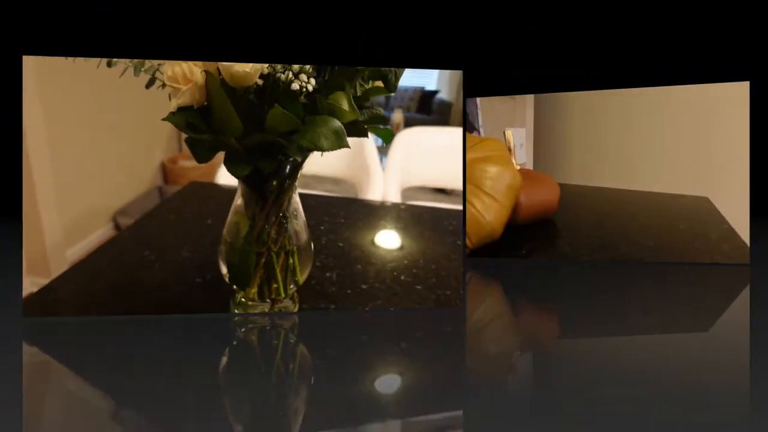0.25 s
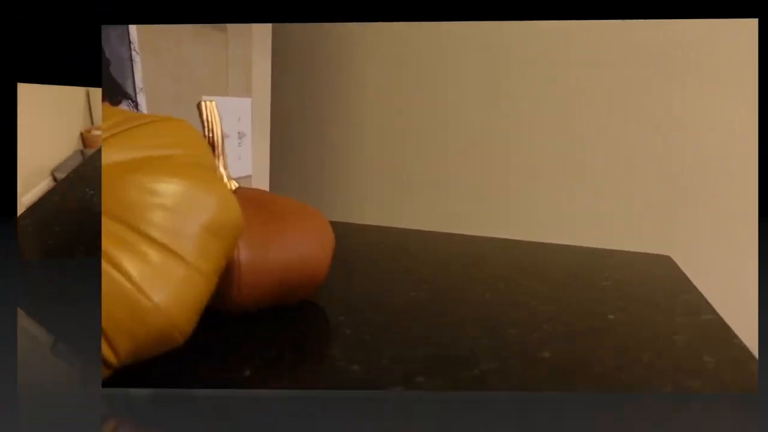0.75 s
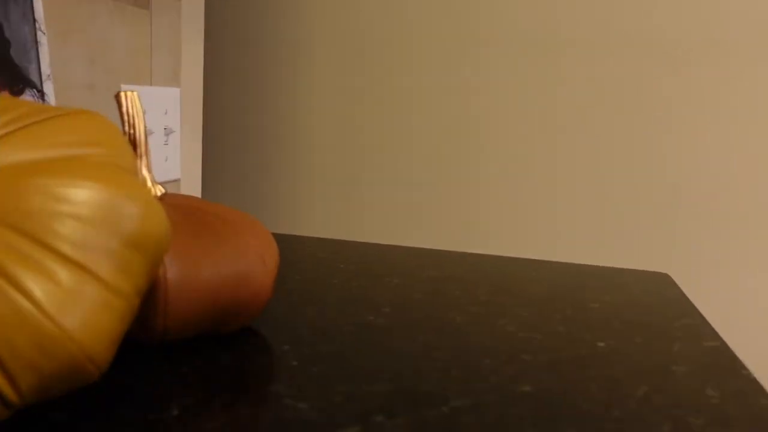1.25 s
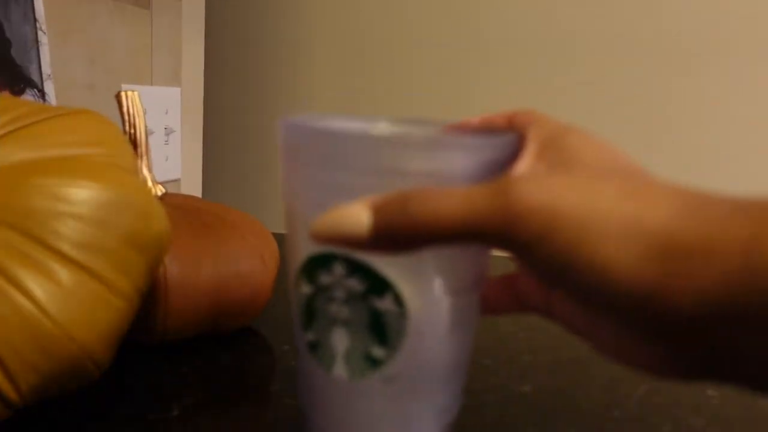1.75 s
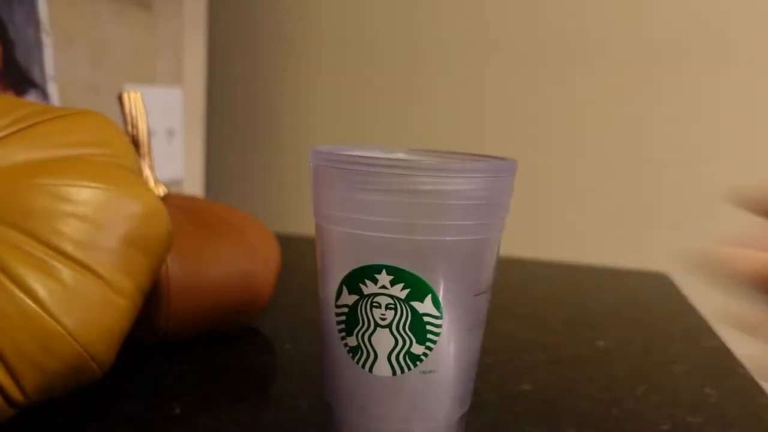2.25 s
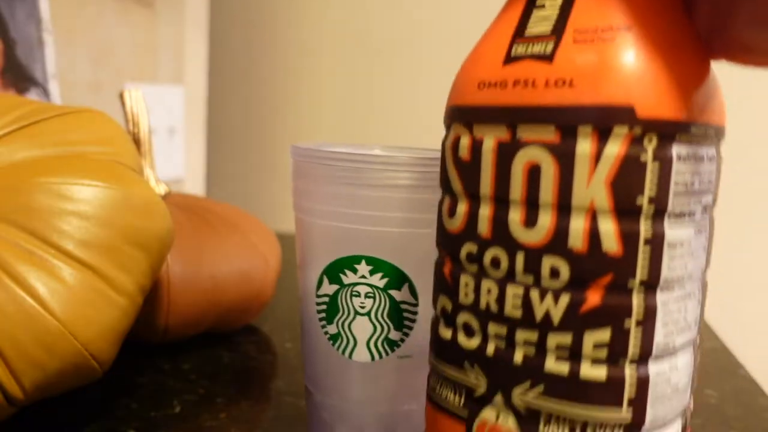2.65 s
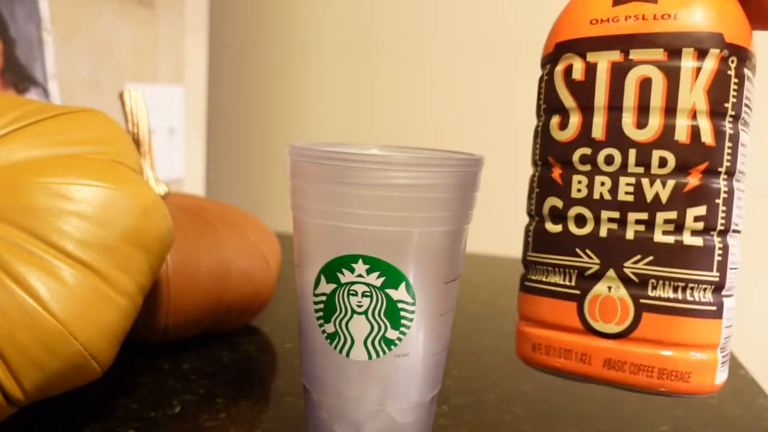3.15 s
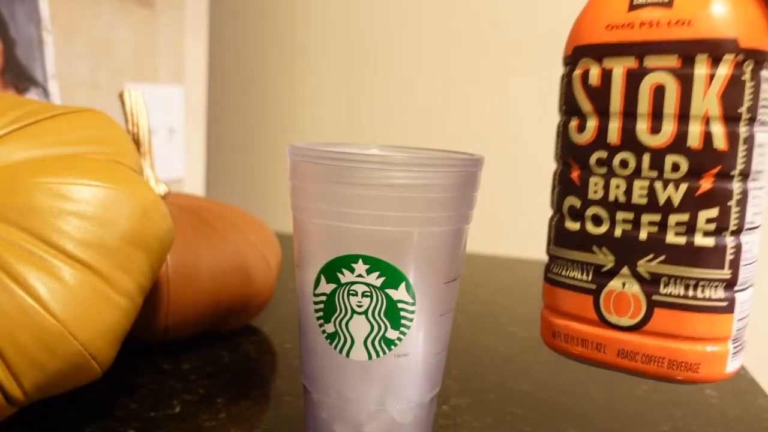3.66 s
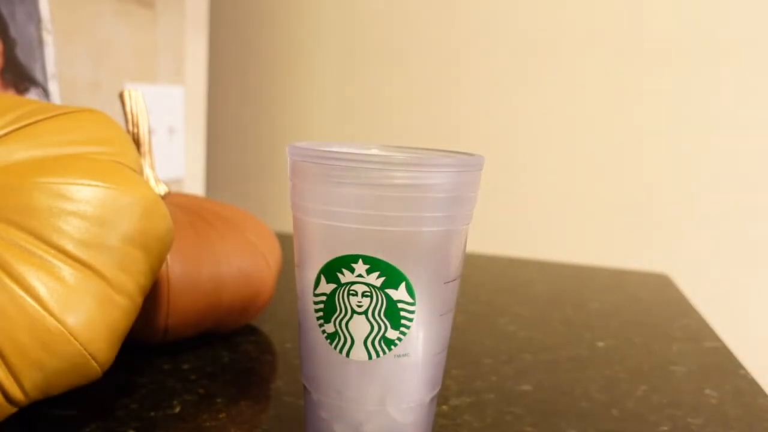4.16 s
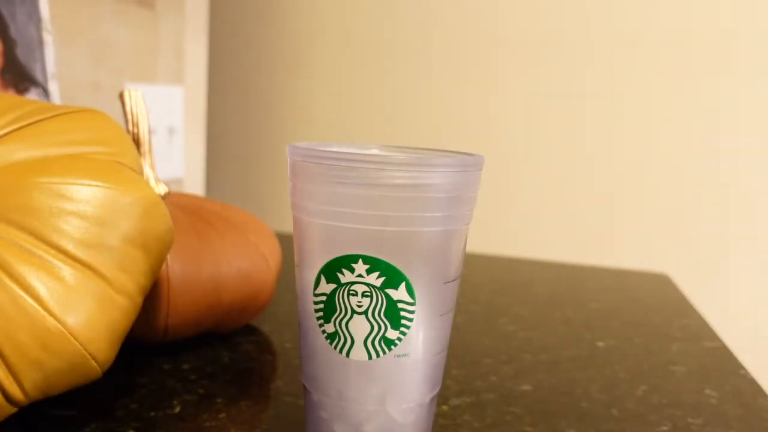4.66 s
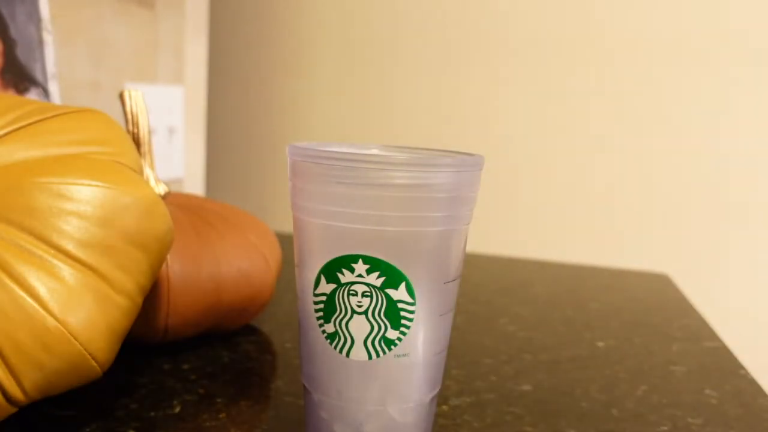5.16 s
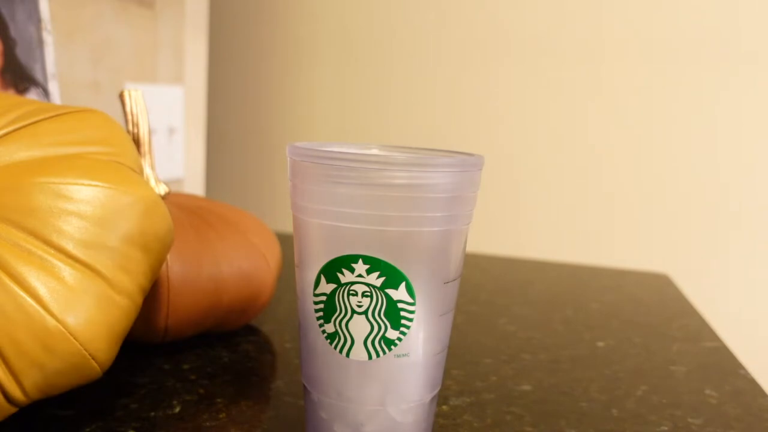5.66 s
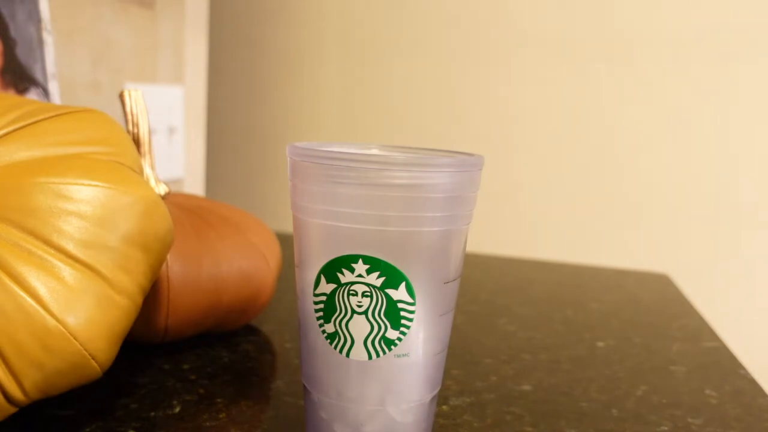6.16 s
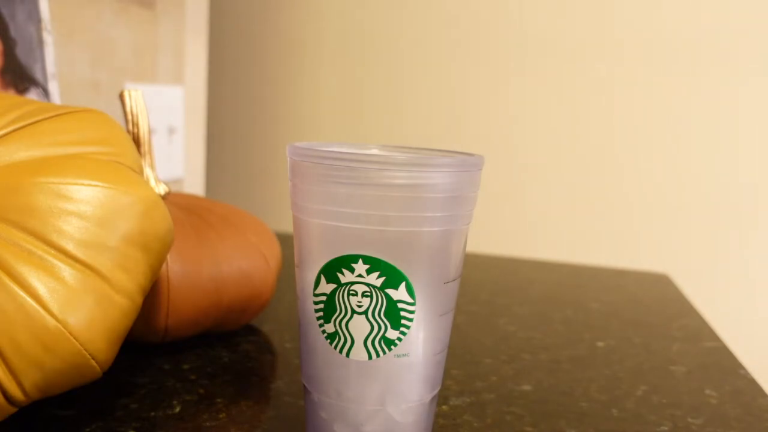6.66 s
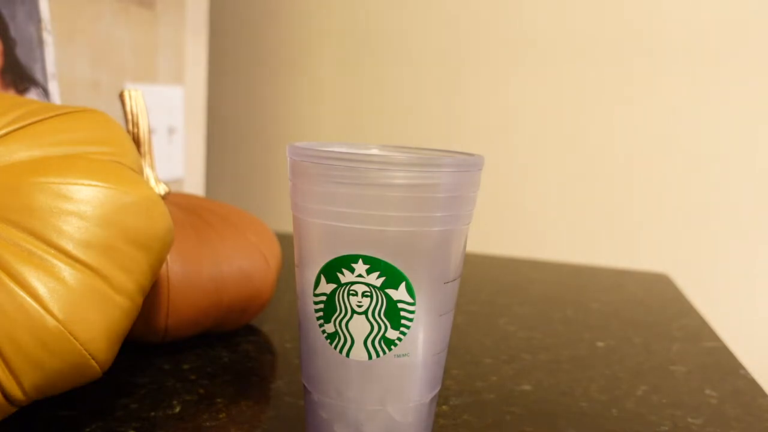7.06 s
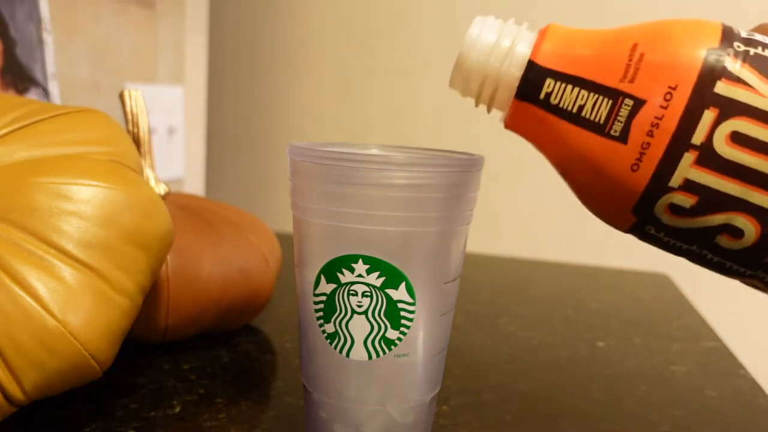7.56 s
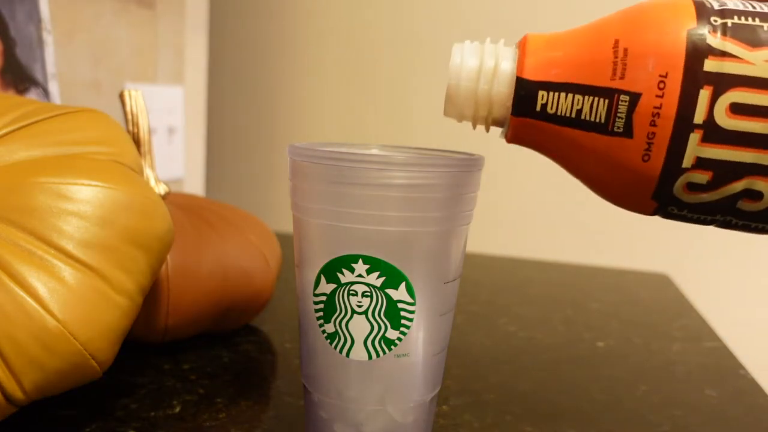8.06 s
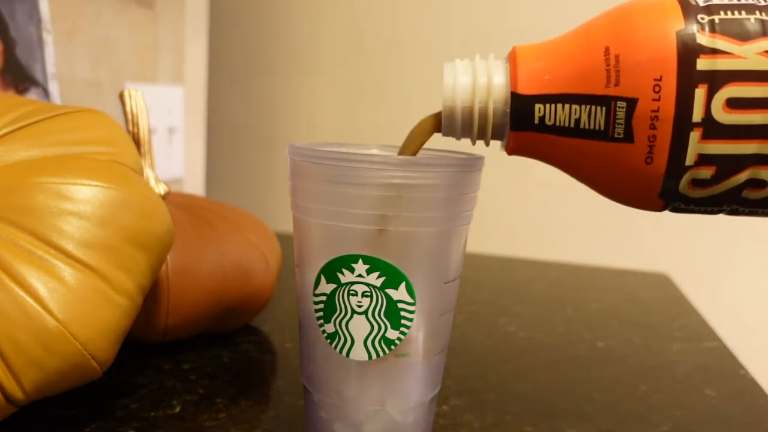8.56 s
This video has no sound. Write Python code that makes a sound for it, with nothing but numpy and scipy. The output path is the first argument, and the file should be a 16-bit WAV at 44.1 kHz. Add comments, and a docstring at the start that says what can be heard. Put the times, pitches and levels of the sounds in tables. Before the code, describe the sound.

Quiet kitchen air and a soft appliance hum fade in over the first half second. Faint light plastic clicks and rubs come at 0.4 and 0.8, with a thin high whine near 0.5, then a quick cluster at 1.25-1.5 and a whine swell at 1.7. At 1.9 a hard plastic cup strikes the stone loudly, with a hollow ring and rocking taps to 2.1. Bottle knocks and a solid thud follow at 2.4-2.65. Near quiet holds, with a faint tick at 3.7 and a click at 4.2. Rubbing at 4.6 leads to dense knocks, cracks and buckling plastic from 4.75 to 5.6. The cap rattles brightly at 6.0-6.13; small taps and rubs follow at 6.4-6.95. The whine returns at 7.2 and weakly until 8.1. Tiny bright splashes and spray enter the cup from 8.5 to 8.8. Close stereo, with sparse room echoes.

```python
"""Hum and air fade in around a quiet kitchen with a stone counter, heard close, at a camera. A hard plastic
cup is picked up and set down, a plastic bottle lands beside it, is squeezed and unscrewed, its cap rattles
free and the first drops splash into the cup, while a thin whine comes and goes in the treble. Blows and
cracks are decaying modes, rubs are dense noise slips, the bass of things is decaying sines; the near things
stay dry against sparse echoes, and the air and appliance are shaped noise."""
import sys
import numpy as np
from scipy import signal
from scipy.fft import rfft, irfft, next_fast_len
from scipy.io import wavfile
from scipy.ndimage import uniform_filter1d

SR = 44100
rng = np.random.default_rng(int(sys.argv[2]) if len(sys.argv) > 2 else 0)


def unload_audio(sound):
    """Save the sound as a 16-bit wav file, at the path given as the first command line argument."""
    columns = np.transpose(np.atleast_2d(sound))
    # keep every value between -1 and 1, then stretch to whole-number steps
    steps = np.round(np.clip(columns, -1, 1) * 32767)
    wavfile.write(sys.argv[1], SR, steps.astype(np.int16))


N = 388521  # samples, about 8.8 s

# All event and band levels stand ahead of the output gain in record().
# Air of the room: (frequency [Hz], density [dB per Hz, relative])
AIR_SPECTRUM = [(15, -52), (25, -23.5), (226, -6), (252, 1.5), (280, -7.5), (483, -16), (600, -3),
                (746, -19), (927, -14), (1360, -21), (1550, -22.5), (2400, -22.5), (10100, -32.5),
                (15200, -35.5), (16500, -61)]
AIR_DB = -50 + 4.0  # level of the whole air noise
# Fuzzy bands of the appliance: (frequency [Hz], width [Hz], level [dB])
APPLIANCE_BANDS = [(251, 5.7, -72.5), (593, 24, -56.5), (1038, 120, -56), (1530, 91, -51),
                   (6080, 56, -63.5)]
# Likeness of left and right in the room tone: (frequency [Hz], likeness [0-1])
LEFT_RIGHT_LIKENESS = [(60, 0.46), (180, 0.75), (550, 0.68), (1650, 0.51), (4970, 0.55), (15000, 1)]

# Blow tables: (time [s], peak at 1.3-3.6 kHz [dB], weight: below 1.3 kHz [relative dB],
#               hardness: 3.6-8 kHz [relative dB])
# Rub tables: (time of peak [s], level at 1.3-3.6 kHz [dB], rise by 20 dB [s], fall by 20 dB [s],
#              weight [relative dB], hardness [relative dB])
# Mode tables: (frequency [Hz], width [Hz], level [dB])
# The cup is picked up and carried over: blows, rubs, modes
PICKUP_BLOWS = [(.398, -30, -7, 0), (.833, -37, -22, 3), (1.247, -48, -18, 10), (1.259, -36, -19, 0),
                (1.3465, -26.5, -11, 3), (1.381, -29.5, -2.2, -16), (1.424, -35, -19, 4.5),
                (1.439, -30, -1.2, -5), (1.461, -31, -12, 0), (1.474, -18.5, -6, 5),
                (1.487, -22.5, -25, -11), (1.497, -27, -20, -7)]
PICKUP_RUBS = [(0.41, -38.5, 0.016, 0.09, -19, 0.5), (0.546, -47.5, 0.11, 0.2, -13, -5),
               (0.84, -44, 0.051, 0.22, -26, 4), (1.275, -47, .06, 0.11, -9, 2),
               (1.37, -50, 0.018, 0.11, 4, -13), (1.46, -44.5, 0.11, 0.0073, 6, -9)]
PICKUP_MODES = [(676, 190, -18), (1226, 86, 5.5), (3000, 450, -26), (3660, 420, -6), (4630, 930, 12),
                (5600, 1500, 18.5), (7750, 740, 5)]
# Swells of the thin whine: (time of peak [s], level [dB], rise by 20 dB [s], fall by 20 dB [s])
WHINE_SWELLS = [(0.514, -55, .04, .16), (1.71, -45.5, .012, 0.24), (7.24, -44.5, .018, 0.32),
                (7.594, -61, .02, 0.073), (7.86, -58, .06, 0.062), (8.072, -55.5, 0.087, 0.14)]
# Resonance of the whine, passed twice: mode columns
WHINE_MODES = [(9880, 640, 22), (10400, 300, 1), (10900, 250, -45)]
# Thumps through the counter: (time [s], level of low mode 1 [dB], mode 2 [dB], mode 3 [dB])
THUMPS = [(1.913, -43, -53, -49), (1.99, -30.5, -55, -40), (2.395, -33, -32.5, -42),
          (2.481, -29, -55, -31.5), (2.616, -29, -33, -28), (4.221, -55, -44, -33.5),
          (4.879, -56, -31, -43), (5.239, -37, -36.5, -42), (5.344, -47, -29, -38),
          (6.134, -78, -63, -41.5)]
# The three low modes of the counter: (frequency [Hz], t60 [s])
COUNTER_MODES = [(66, 0.18), (102, 0.3), (150, 0.29)]
# The cup is set down, then rocks and slides to rest: blows, rubs, modes
CUP_BLOWS = [(1.916, -6, -1, -8.5), (1.9382, -17, 0, -13), (1.9674, -19, -4, -22), (1.9934, -18, -1, -4),
             (2.0412, -26, -19, 4.5), (2.058, -28.5, -14, 4.5), (2.085, -36, -7, 3), (2.113, -34.5, -5, 2)]
CUP_ROCKING = [(1.948, -22.5, 0.023, 0.077, 5.3, -4.5), (2.07, -39.5, .08, 0.17, 5.5, -8),
               (2.65, -30.5, 0.029, 0.0095, 9.6, 3)]
CUP_MODES = [(668, 12.3, -1.5), (743, 20, -6.5), (863, 92, 0), (1000, 120, 2.5), (1590, 870, -1),
             (2400, 450, -12.5), (3550, 330, -7), (5460, 2100, -1.5), (6800, 1300, -42)]
# Air in the empty cup humming after a jolt: (time [s], level [dB], t60 [s])
CUP_HUMS = [(1.917, -0.5, 0.1), (1.969, -11.5, 0.27), (1.995, -9.5, 0.29), (2.6165, 4, 0.056),
            (2.629, -12, 0.13)]
CUP_AIR_HZ = 666.8
# Sharp cracks of stiff plastic: (time [s], level [dB], frequency [Hz])
CRACKS = [(1.9175, -1.5, 3600), (4.2125, -16, 4500), (4.219, -9, 2200), (4.741, -2, 1000),
          (4.917, -6.5, 910), (4.7505, -14, 1810), (4.9655, -15, 2000), (5.0105, 6, 5900),
          (5.2845, 4, 7260), (5.5448, -2, 7140), (6.0515, -3, 3850), (6.1015, 8.5, 3600),
          (6.1332, -6.5, 3900), (6.9595, -15, 5000)]
CRACK_CYCLES = 1.6  # cycles for a crack to sink to 1/e
# The bottle is handled: blows, then rubs of sliding hands and creasing plastic, modes
BOTTLE_BLOWS = [(2.3978, -26, 5, -16), (2.4157, -42, 13, -18), (2.483, -13.5, -0.5, -9.5),
                (2.5063, -28, 4, -6), (2.5252, -34, 0, -6), (2.5826, -21, 3.5, -2.5),
                (3.7048, -34, -1, -3.5), (4.2099, -28.5, -3, 5), (4.2174, -25.5, -5, -2),
                (4.7409, -11.5, 4, -11.5), (4.7487, -12, 1.5, -7), (4.8768, -35, 5.5, -8),
                (4.9165, -14.5, 3.5, -7.5), (4.9551, -29, -11, -2.2), (4.9641, -8, -5.5, -9.5),
                (4.9988, -14, -22, -5), (5.0097, -15, -15, 7), (5.0131, -10.5, -1, -11),
                (5.027, -5, -11.5, -19), (5.0338, -12, 0.5, -8), (5.073, -17.5, 1.5, -19),
                (5.1525, -7.5, -0.5, -10.5), (5.1935, -35, 12, -22), (5.2124, -6.5, -6.5, -14),
                (5.2353, -15.5, -14, 1), (5.2381, -5.5, 1, -16), (5.2526, -16, 9.5, -8),
                (5.2571, -22, 4, 5), (5.2843, -5.5, -25, -11), (5.3124, -20, -19, -15),
                (5.3295, -14.5, -13, -21), (5.3573, -14, 5, -4), (5.383, -28, -17, -4),
                (5.4093, -6, -1.7, -5), (5.4245, -5.5, -10, -3), (5.4312, -8.5, -11, -7),
                (5.4366, -9.5, -7, -13), (5.5447, -23, -10, 10.5), (5.5758, -18.5, -8, -17.5),
                (5.6129, -18, -8, -1.5)]
BOTTLE_RUBS = [(2.53, -42.5, 0.018, 0.011, 14, -9), (2.585, -33, 0.046, 0.071, -9, -3),
               (3.724, -44, 0.018, 0.024, -20, -2), (3.87, -53, 0.15, 0.56, -10, -2.5),
               (4.21, -34.5, 0.013, 0.014, 1.5, 3.5), (4.45, -53, 0.24, 0.18, -6, -1),
               (4.576, -35, 0.0099, 0.079, -13, 1), (4.6, -31, .04, 0.062, -3, -9.5),
               (4.695, -40.5, 0.061, 0.054, -5, -3), (4.736, -36, .015, 0.0059, 1, -2.5),
               (4.96, -30, 0.051, 0.0069, -6, -4.5), (5.29, -17.5, 0.007, 0.008, -17, 2.3),
               (5.33, -18, 0.028, 0.036, 1.5, -8), (5.54, -43.5, 0.028, .012, -10.5, 3.5),
               (5.405, -26, .045, 0.0066, -7, -4.5), (6.38, -47.5, 0.028, .2, -4, 4.5),
               (6.53, -45.5, .012, 0.048, -7, 0.5), (6.63, -47.5, .08, .05, -5, 1.5),
               (6.8, -46, 0.12, 0.095, -13, 3.5), (6.895, -49, 0.026, .012, 0, -2),
               (6.909, -34, 0.01, 0.064, -12.5, 1.5), (6.955, -38, 0.023, 0.013, -9, 8),
               (7.2, -54.5, 0.33, 0.53, 1, 3.5)]
BOTTLE_MODES = [(346, 420, -13), (740, 244, 0.5), (1069, 57, -1), (1380, 440, 7), (2210, 790, 7),
                (3000, 620, 1.5), (4740, 910, 5), (6010, 290, -2.5), (8300, 1070, 2)]
# Where bottle blows and cracks sit: (time [s], left minus right [dB]; blows weight it by band)
BOTTLE_PLACE = [(2.4, 0.5), (4.2, 1), (4.75, 0.1), (4.95, -2.5), (5.25, -2.5), (5.36, -2), (5.45, -0.5),
                (5.6, -1.1), (6., 0.5)]
# Full bottle meeting the stone: blows, modes
LANDING_BLOWS = [(2.609, -20, 4.5, 3), (2.6165, -11.5, -8, -4), (2.632, -28, 13, 3),
                 (2.651, -29.5, 11.5, 6)]
LANDING_MODES = [(650, 61, 1), (685, 27, -2), (1146, 76, -3), (2820, 150, -7.5), (3450, 430, 0),
                 (5000, 1900, 2), (7300, 770, -26)]
# The bottle wall buckles: (time [s], level [dB], frequency [Hz])
BUCKLES = [(4.219, -27.5, 242), (5.149, -28, 333), (5.239, -30.5, 207), (5.27, -29, 267), (5.254, -15, 378),
           (5.314, -25, 475), (5.354, -7, 379), (5.38, -20, 260), (5.411, -21, 305), (5.421, -17, 299.3),
           (5.428, -11.5, 324), (5.436, -16, 463), (6.132, -22.5, 322)]
BUCKLE_T60_S = 0.096
# The cap rattles free: blows, modes once it is loose on the neck
CAP_BLOWS = [(5.9915, -0.5, -26, -9), (6.0252, -15.5, -30, -7.5), (6.0454, -1, -22, -0.5),
             (6.0512, 0.5, -27, 0.5), (6.0665, -5, -15.5, -7), (6.0916, -6, -29, 2.5),
             (6.1, -14.5, -12.5, -15), (6.1229, -9, -24, -4), (6.1315, -6, -13, 6)]
CAP_MODES = [(1750, 97, -34), (2040, 56, 1), (2360, 110, -1.5), (2576, 150, 0), (2870, 130, 10),
             (3250, 570, 0.5), (4070, 500, 0), (4470, 700, -2), (5900, 310, -12.5)]
TIGHT_UNTIL_S, TIGHT_PITCH = 6.04, 1.06  # while the cap grips the neck its modes sit higher
# The cap is laid down: blows, modes
CAP_LAID_DOWN = [(6.3689, -30, -3, 1.5), (6.4243, -35, -5, -5), (6.5175, -41, -11, 5),
                 (6.8996, -22, -22, -2.5), (6.9154, -32, -16, -2), (6.9592, -15.5, -8, 13)]
LOOSE_CAP_MODES = [(1430, 470, 2), (2450, 900, -1), (4400, 460, 3), (5200, 700, 7.5), (8150, 1300, -4),
                   (11100, 1700, -15)]
# Splashes in the cup: (time [s], peak [dB], ring frequency [Hz])
DROPS = [(8.498, -26.5, 6370), (8.499, -31, 8000), (8.563, -28, 4530), (8.6096, -36.5, 4280),
         (8.7034, -33.5, 5200), (8.7587, -35, 5900), (8.7644, -31, 6140), (8.7738, -30, 4160)]
# Fine spray on the wall of the cup: rub columns
SPRAY = [(8.505, -68, .008, 0.078, -19, 6.9), (8.565, -54, 0.0088, .08, -19, 2.6),
         (8.778, -59, 0.065, 0.044, 4, 16)]

# Decay of the kitchen's echoes: (frequency [Hz], t60 [s])
KITCHEN_T60 = [(100, 0.83), (500, 0.5), (2000, 0.55), (5000, 0.4), (9000, 0.5), (16000, 0.25)]
# Width of the echoes: (frequency [Hz], side gain [dB] ahead of the decay)
ECHO_SIDE = [(100, -18), (500, -9.5), (1500, -11), (4000, -24), (8000, -55), (15000, -26)]

LEAD = 256  # samples by which a filtered blow starts early
SNAP_DB = -11.5  # bare first tick of a blow, against its peak
SCATTER_DB = 1  # random left-right shift of each blow, either way, ahead of the weighting by band
FADE_DB, FADE_S, SETTLED_DB = -37, 0.25, -14  # start below settled [dB], time constant [s], output gain [dB]
EDGE_HZ = 16000  # upper band limit


def gain_of(db):
    """Decibels to a factor."""
    return 10 ** (np.asarray(db) / 20)


def evened(x):
    """Scales to rms 1."""
    return x / np.sqrt(np.mean(x ** 2) + 1e-20)


def crest(x):
    """Height of the loudest millisecond: its rms times the square root of two."""
    return np.sqrt(2 * uniform_filter1d(x ** 2, size=44).max())


def read(points, hz):
    """Reads a spectrum table on a log-frequency axis."""
    f, value = np.transpose(points)
    return np.interp(np.log(hz + 1), np.log(f + 1), value)


def bandpass(x, low_hz, high_hz):
    """Keeps the band between two frequencies."""
    return signal.sosfilt(signal.butter(2, [low_hz, high_hz], "bandpass", fs=SR, output="sos"), x)


def add(mix, s, sound, pan_db=0.):
    """Places a mono sound at s seconds in both channels; pan_db is left minus right."""
    part = mix[:, round(s * SR):][:, :len(sound)]
    part += sound[:part.shape[1]] * gain_of([[pan_db / 2], [-pan_db / 2]])


def swell(peak_s, rise_s, fall_s):
    """Start time and a level that climbs 20 dB in rise_s and sinks 20 dB in fall_s, followed over 40 dB."""
    t = np.arange(-2 * rise_s, 2 * fall_s, 1 / SR)
    return peak_s + t[0], gain_of(20 * np.minimum(t / rise_s, -t / fall_s))


def split(x):
    """Bass, middle, presence and top parts that cross over smoothly; they start LEAD samples early."""
    size = next_fast_len(len(x) + 2 * LEAD)
    octaves = np.log2(np.fft.rfftfreq(size, 1 / SR) + 1)
    above = [np.clip((octaves - np.log2(hz)) / .5 + .5, 0, 1) for hz in (130, 1300, 3600, 8000)]
    z = rfft(np.pad(x, (LEAD, 0)), size)
    return [irfft(z * (low - high), size)[:len(x) + LEAD] for low, high in zip(above, above[1:] + [0])]


def ring(modes, tick_db, tick_hz):
    """A body's impulse responses: its decaying modes, and a bare tick between tick_hz and the dull top."""
    t = np.arange(4000) / SR
    out = sum(gain_of(db) * np.exp(-np.pi * width * t) * np.sin(2 * np.pi * hz * t) for hz, width, db in modes)
    return out / np.linalg.norm(out), gain_of(tick_db) * bandpass(1. * (t == 0), tick_hz, 11000)


def contact(half_hold_ms, body, clean):
    """A clean snap rings the modes; rough chatter holds for about twice half_hold_ms and stops."""
    modes, tick = body
    t = np.arange(1200) / SR
    hold_s = 2.01 * half_hold_ms / 1000
    chatter = rng.standard_normal(len(t)) * np.exp(-(t / hold_s) ** 1.8)
    chatter /= np.linalg.norm(chatter)
    rough = signal.fftconvolve(chatter, 1.18 * modes + tick)[:len(modes)]
    return clean * (modes + 0.093 * tick) + rough


def blows(rows, body, clean, half_hold_ms, top_db, place=((0, 0),)):
    """Each contact rings the body; hard ones reach high, soft ones are dull. Presence leans furthest aside."""
    out, ticks = np.zeros((2, N)), split(body[1][:LEAD])
    for s, db, bass_db, hard_db in rows:
        pan_db = np.interp(s, *np.transpose(place)) + SCATTER_DB * rng.uniform(-1, 1)
        colour = (bass_db, 0, hard_db, top_db + hard_db)
        parts = split(contact(half_hold_ms, body, clean))
        for part, rel_db, lean in zip(parts, colour, (1.2, 2.8, 4.5, 1.2)):
            add(out, s - LEAD / SR, gain_of(db + rel_db) * part / crest(part), lean * pan_db)
        for part, rel_db in zip(ticks, colour):
            add(out, s - LEAD / SR, gain_of(db + rel_db + SNAP_DB) * part / abs(part).max(), pan_db)
    return out


def rubbing(rows, body, pan_db, top_db):
    """Dense tiny slips of uneven size shake the plastic."""
    sizes = gain_of(0.4 * np.minimum(rng.exponential(1, N), 3.5))
    slips = rng.standard_normal(N) * (rng.random(N) < 8000 / SR) * sizes  # about 8000 a second
    parts = [evened(part[LEAD:]) for part in split(signal.fftconvolve(slips, sum(body))[:N])]
    out = np.zeros((2, N))
    for peak_s, db, rise_s, fall_s, bass_db, hard_db in rows:
        s, level = swell(peak_s, rise_s, fall_s)
        colour = (bass_db, 0, hard_db, top_db + hard_db)
        start = round(s * SR)
        rub = sum(gain_of(db + rel_db) * part[start:][:len(level)] for part, rel_db in zip(parts, colour))
        add(out, s, level[:len(rub)] * rub, pan_db)
    return out


def booms(rows, rise_s):
    """A low wave that swells quickly and dies; rows are (time [s], level [dB], frequency [Hz], t60 [s])."""
    out, t = np.zeros((2, N)), np.arange(SR // 2) / SR
    for s, db, hz, t60 in rows:
        level = gain_of(db - 60 * t / t60) * (1 - np.exp(-t / rise_s))
        add(out, s, level * np.sin(2 * np.pi * hz * t))
    return out


def room_tone():
    """Smooth air noise with the fuzzy bands of an appliance, partly alike on both sides."""
    frames, hz = N // 512 + 5, np.fft.rfftfreq(2048, 1 / SR)
    a, b, c, d, patches = rng.standard_normal((frames, 1025, 5)).T
    # slight unevenness over time and frequency
    patches = evened(uniform_filter1d(uniform_filter1d(patches, 16, 0), 10, 1))
    bands = sum(gain_of(db) ** 2 / (np.pi * width / 2) / (1 + (2 * (hz - f) / width) ** 2)
                for f, width, db in APPLIANCE_BANDS)
    air = gain_of(read(AIR_SPECTRUM, hz)) ** 2
    air = air / (air.sum() * hz[1]) * gain_of(AIR_DB) ** 2
    power = air + bands
    same = read(LEFT_RIGHT_LIKENESS, hz)[:, None]
    left = a + 1j * b
    right = same * left + np.sqrt(1 - same ** 2) * (c + 1j * d)
    z = np.array([left, right]) * np.sqrt(power)[:, None] * gain_of(0.24 * patches)
    noise = signal.istft(z, nperseg=2048, noverlap=1536)[1][:, :N]
    return np.sqrt(power.sum() * hz[1]) * evened(noise)


def cup_picked_up():
    """Farther off, small plastic contacts and rubs ring a bright body as the cup is carried over."""
    body = ring(PICKUP_MODES, tick_db=3, tick_hz=1510)
    clicks = blows(PICKUP_BLOWS, body, clean=0.39, half_hold_ms=3.3, top_db=-27)
    return clicks + rubbing(PICKUP_RUBS, body, pan_db=-1.5, top_db=-10)


def whine():
    """A narrow fizz near 10 kHz, perhaps the lens motor: noise through the same resonance twice."""
    band, level = ring(WHINE_MODES, tick_db=-29, tick_hz=8000)[0], np.zeros((2, N))
    for peak_s, db, rise_s, fall_s in WHINE_SWELLS:
        s, shape = swell(peak_s, rise_s, fall_s)
        add(level, s, gain_of(db) * shape)
    fizz = signal.fftconvolve(rng.standard_normal(N), signal.fftconvolve(band, band))[:N]
    return level * evened(fizz)


def counter():
    """Each thump sets the low modes of the counter going."""
    return sum(booms([(row[0], row[1 + k], hz, t60) for row in THUMPS], rise_s=0.0021)
               for k, (hz, t60) in enumerate(COUNTER_MODES))


def cup_set_down():
    """Hard plastic strikes the counter and rings, then rocks and slides to rest."""
    body = ring(CUP_MODES, tick_db=-10.5, tick_hz=694)
    strikes = blows(CUP_BLOWS, body, clean=0.52, half_hold_ms=3.6, top_db=-11)
    return strikes + rubbing(CUP_ROCKING, body, pan_db=-0.5, top_db=-13)


def cup_air():
    """A jolt makes the air in the empty cup hum at one resonance."""
    return booms([(s, db, CUP_AIR_HZ, t60) for s, db, t60 in CUP_HUMS], rise_s=0.0013)


def cracks():
    """Stiff plastic cracks: a wave that dies within a cycle or two."""
    out, t = np.zeros((2, N)), np.arange(400) / SR
    for s, db, hz in CRACKS:
        crack = np.exp(-t * hz / CRACK_CYCLES) * np.cos(2 * np.pi * hz * t)
        add(out, s, gain_of(db) * crack, np.interp(s, *np.transpose(BOTTLE_PLACE)))
    return out


def bottle_handled():
    """Knocks ring the bottle's broad modes; sliding hands and creasing plastic rub them."""
    body = ring(BOTTLE_MODES, tick_db=3.5, tick_hz=497)
    knocks = blows(BOTTLE_BLOWS, body, clean=0.48, half_hold_ms=2.64, top_db=-9, place=BOTTLE_PLACE)
    return knocks + rubbing(BOTTLE_RUBS, body, pan_db=-4.0, top_db=-8)


def bottle_landing():
    """The full bottle meets the stone and rings its own modes."""
    body = ring(LANDING_MODES, tick_db=-15, tick_hz=1510)
    return blows(LANDING_BLOWS, body, clean=0.68, half_hold_ms=4.7, top_db=-24.0)


def buckles():
    """The bottle wall buckles: each time a short low boom."""
    return booms([(*row, BUCKLE_T60_S) for row in BUCKLES], rise_s=0.00085)


def cap_rattling():
    """The cap rattles on the neck; its modes drop in pitch once it no longer grips."""
    out = np.zeros((2, N))
    for tight in (True, False):
        rows = [row for row in CAP_BLOWS if (row[0] < TIGHT_UNTIL_S) == tight]
        modes = [(hz * TIGHT_PITCH ** tight, width, db) for hz, width, db in CAP_MODES]
        body = ring(modes, tick_db=-10.0, tick_hz=2200)
        out += blows(rows, body, clean=0.63, half_hold_ms=3.05, top_db=-16)
    return out


def cap_laid_down():
    """The free cap taps down, ringing broad bright modes."""
    body = ring(LOOSE_CAP_MODES, tick_db=-0.5, tick_hz=1150)
    return blows(CAP_LAID_DOWN, body, clean=0.35, half_hold_ms=2.65, top_db=-8.5)


def drops():
    """Liquid slaps the dry wall of the cup: a short bright ring and a spray."""
    out = np.zeros((2, N))
    for s, db, hz in DROPS:
        modes = [(hz, 330, 0), (1.2 * hz, 380, -3.5), (0.53 * hz, 250, -9)]
        slap = contact(3.1, ring(modes, tick_db=-22, tick_hz=2000), clean=0.38)
        add(out, s, gain_of(db) * slap / crest(slap))
    cup_body = ring(CUP_MODES, tick_db=-10.5, tick_hz=694)
    return out + rubbing(SPRAY, cup_body, pan_db=0.0, top_db=-15)


def slab_bounce(x, count=9):
    """The stone throws treble back count samples later, opposite in sign at the two microphone ports."""
    treble = bandpass(x.mean(0), 3500, 13000)
    return gain_of(-14.5) * np.roll(treble, count) * [[1], [-1]]


def kitchen(x, first_s=0.0014):
    """Sparse reflections of random sign build up after the first wall, each band dying at its own speed."""
    taps = np.zeros((2, SR))
    slots = np.arange(0, SR - 20, 20)  # one reflection in every 20 samples
    at = slots + rng.integers(0, 20, (2, len(slots)))
    np.put_along_axis(taps, at, rng.choice([-1., 1.], at.shape), 1)
    hz, t, z = signal.stft(taps, SR, nperseg=256)
    z[1] *= gain_of(read(ECHO_SIDE, hz))[:, None]
    decay = gain_of(-60 * t / read(KITCHEN_T60, hz)[:, None])
    mid, side = signal.istft(z * decay, SR, nperseg=256)[1]
    build_up = np.clip((np.arange(len(mid)) / SR - first_s) / 0.0077, 0, 1)
    tail = build_up * np.array([mid + side, mid - side]) / np.linalg.norm(build_up * mid)
    return signal.fftconvolve(x, tail, axes=1)[:, :N]


def scene():
    """Things on and near the counter with their own echo levels, over the counter, whine and room tone."""
    # (sound, level sent to the echoes [dB])
    things = [(cup_picked_up(), -9.0), (cup_set_down(), -3.5), (cup_air(), -17.0), (cracks(), -12.0),
              (bottle_handled(), -8.5), (bottle_landing(), -13.0), (buckles(), -12.5),
              (cap_rattling(), -4.0), (cap_laid_down(), -12.5), (drops(), -7.0)]
    direct = sum(thing for thing, _ in things)
    echoes = kitchen(sum(gain_of(echo_db) * thing for thing, echo_db in things))
    return direct + slab_bounce(direct) + echoes + counter() + whine() + room_tone()


def record(dry):
    """The microphone drops the deepest bass; then the fade-in and the upper band limit."""
    thinned = signal.sosfilt(signal.butter(3, 55, "highpass", fs=SR, output="sos"), dry)
    t = np.arange(N) / SR
    faded = thinned * gain_of(SETTLED_DB + FADE_DB * np.exp(-t / FADE_S))
    lowpass = signal.firwin(511, EDGE_HZ, window=("kaiser", 9), fs=SR)
    return signal.oaconvolve(faded, lowpass[None], "same")


dry = scene()
out = record(dry)
unload_audio(out)
```